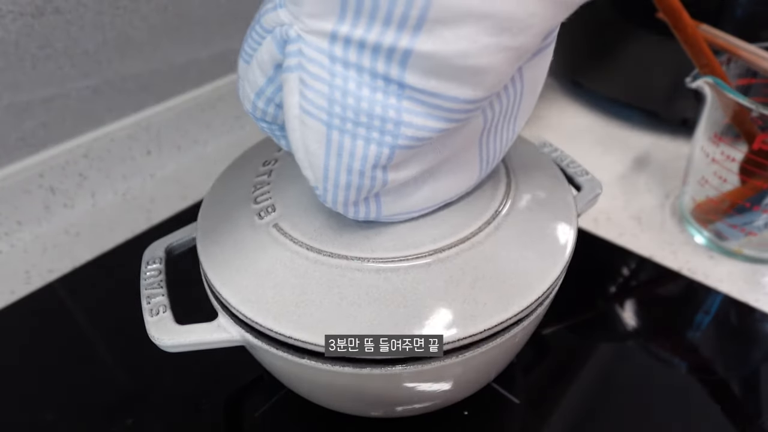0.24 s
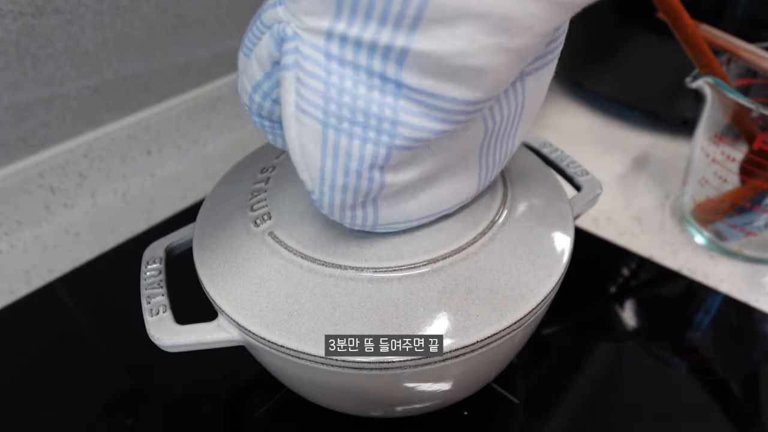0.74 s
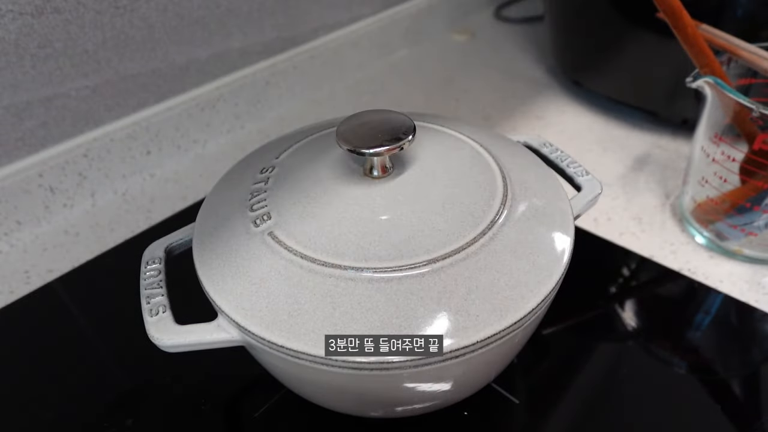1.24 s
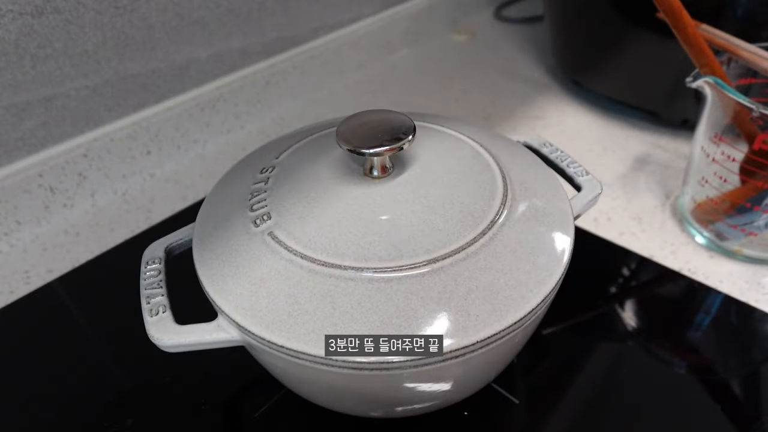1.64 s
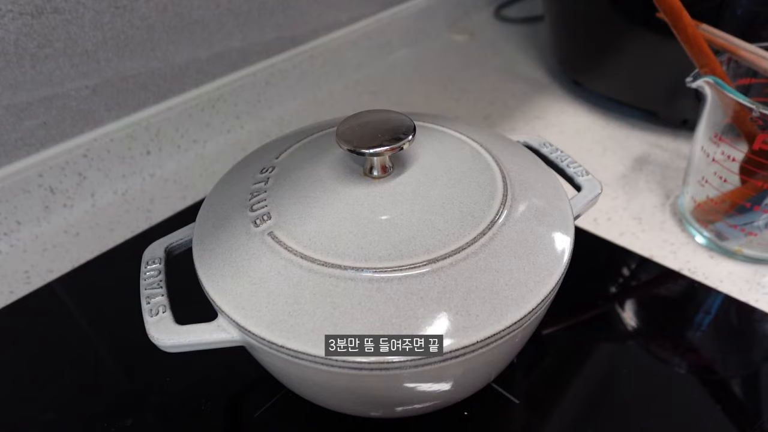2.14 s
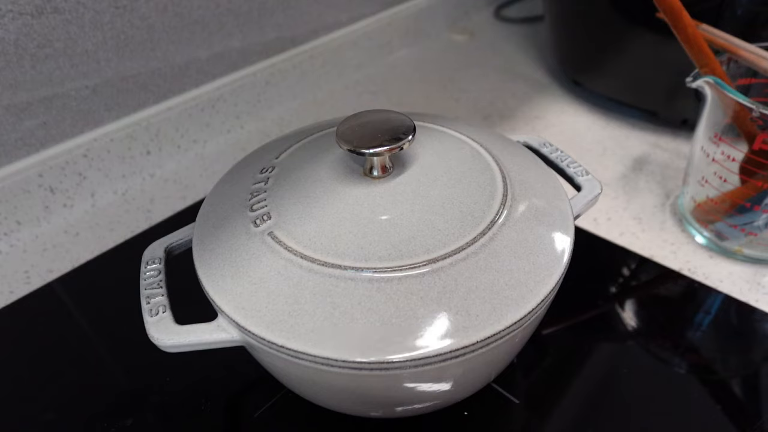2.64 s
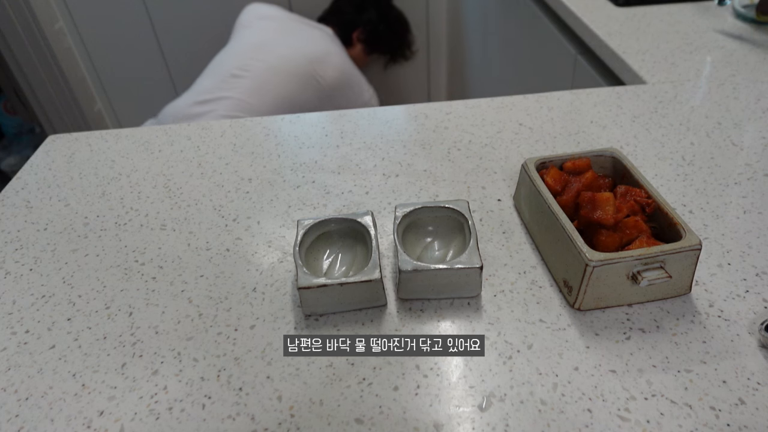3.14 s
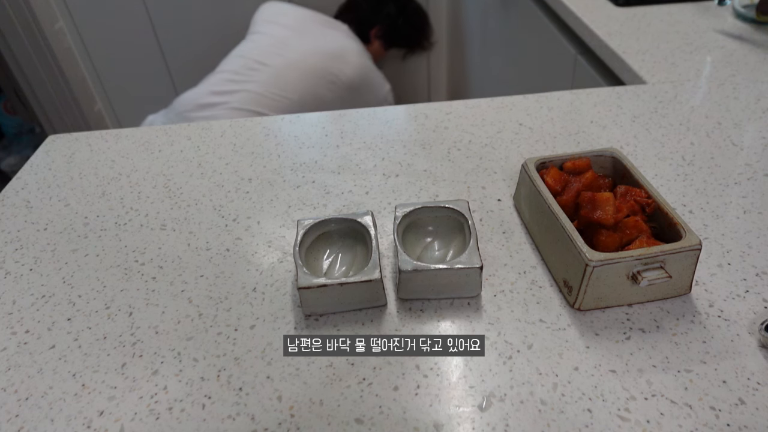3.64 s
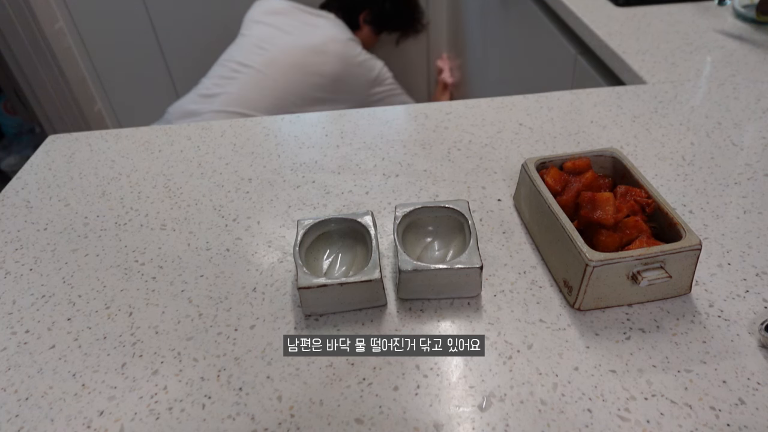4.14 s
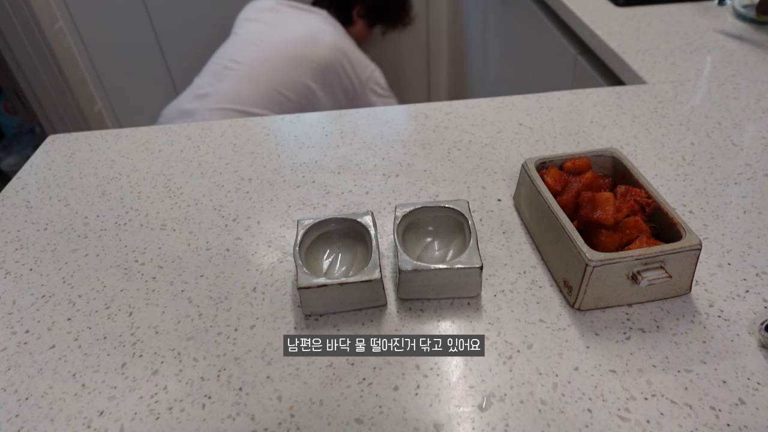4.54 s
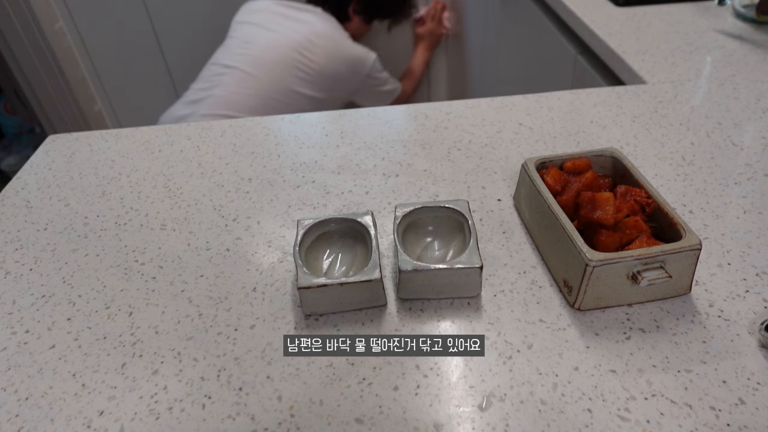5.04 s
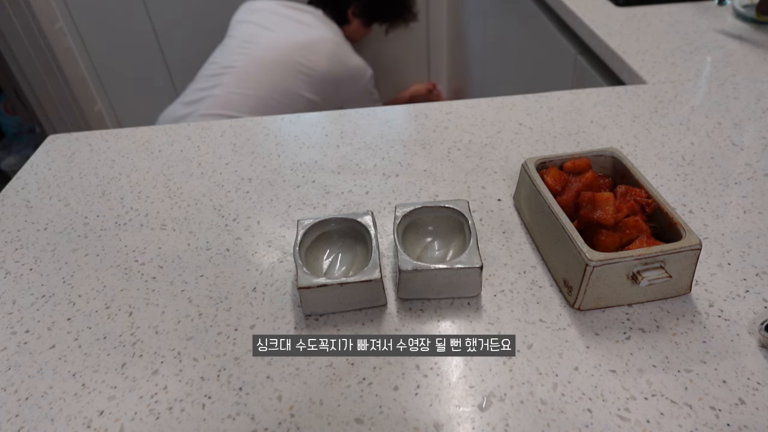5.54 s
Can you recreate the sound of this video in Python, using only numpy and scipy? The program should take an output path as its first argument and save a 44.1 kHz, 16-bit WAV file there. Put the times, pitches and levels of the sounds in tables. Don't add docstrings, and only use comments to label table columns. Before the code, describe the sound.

A quiet home kitchen with steady hood-fan rush and faint fridge hum, nearly mono. At 0-0.13 s thin, wavering steam whistles escape a narrowing gap. At 0.13 s a heavy enamelled iron lid strikes its pot close by, ringing brightly over a low thud, and rocks until 0.28. At 0.38 it drops flat with another clank, then bounces and chatters at 0.46-0.6, quickly damped. From 0.9 to 2.6 s a quilted mitt rustles softly, with a sharp plastic tick at 1.3 and a soft bump near 2.2. At 2.65 the place changes: the fan rush grows fuller and lower. Behind a counter a rag wipes the floor in short, uneven, grainy strokes. A hard, multiple clack with a thump lands at 3.17, smaller knocks at 4.0, hollow, strong cupboard bumps at 4.31-4.4, and light clinks at 4.67-5.1. Last brushes and a clack come around 5.3-5.6, blurred by room echoes.

```python
import sys
import numpy as np
from scipy import signal
from scipy.fft import rfft, irfft, next_fast_len
from scipy.io import wavfile
from scipy.ndimage import uniform_filter1d, map_coordinates

SR = 44100
rng = np.random.default_rng(int(sys.argv[2]) if len(sys.argv) > 2 else 0)


def gain_from_db(level_db):
    decades = np.asarray(level_db, float) / 20
    return 10 ** decades


def transcribe(signal):
    frames = np.atleast_2d(signal).T
    limited = np.clip(frames, -1, 1)
    pcm = np.round(limited * 32767).astype(np.int16)
    wavfile.write(sys.argv[1], SR, pcm)


N = 255339
TIME = np.arange(N) / SR


def unit(x):
    return x / np.sqrt(np.mean(x ** 2) + 1e-20)


def along(points, hz):
    point_hz, point_db = np.transpose(points)
    return np.interp(np.log(hz + 1), np.log(point_hz + 1), point_db)


def noise(n, gain):
    m = next_fast_len(n)
    spectrum = rfft(rng.standard_normal(m)) * gain(np.fft.rfftfreq(m, 1 / SR))
    return unit(irfft(spectrum, m)[:n])


def coloured(points):
    return lambda hz: gain_from_db(along(points, hz))


def bump(centre_hz, octaves):
    return lambda hz: np.exp(-.5 * (np.log2((hz + 1) / centre_hz) / octaves) ** 2)


def wobble(rate):
    return map_coordinates(rng.standard_normal(int(N * rate / SR) + 4), [TIME * rate])


def patchy(x, depth_db, bins, frames):
    z = signal.stft(x, nperseg=256)[2]
    field = uniform_filter1d(rng.standard_normal(z.shape), bins, axis=0)
    field = uniform_filter1d(field, frames, axis=1)
    return signal.istft(z * gain_from_db(depth_db * unit(field)), nperseg=256)[1][:N]


def add(track, s, sound):
    part = track[round(s * SR):]
    part[:len(sound)] += sound[:len(part)]


# (pitch_hz, level_db)
HOOD_COLOUR = [(15, -39), (30, -18), (49, -13.5), (123, 0.5), (180, -11.5), (293, -5.5), (400, -7),
               (560, -22), (760, -30.5), (950, -20), (1230, -15.5), (2300, -22.5), (3520, -28),
               (16000, -35.5)]
# (pitch_hz, level_db)
COUNTER_COLOUR = [(15, -20), (25, 5.5), (70, 7), (117, -1.5), (242, 5), (335, 0), (416, -5), (607, -10.5),
                  (754, -28), (911, -12.5), (1330, -6.5), (2110, -19), (2350, -15), (3160, -27),
                  (16000, -28.5)]
# (pitch_hz, near_hob_db, at_counter_db)
MOTOR_HUMS = [(46.6, -51, -67), (125.5, -60.5, -61.5), (161.8, -58.5, -55.5), (240.5, -63, -56),
              (263, -62.5, -84), (361.6, -65.5, -93), (379, -86, -74.5), (454, -64.5, -63.5),
              (1214, -67, -81), (1493, -65.5, -71), (1687, -63, -67)]


def kitchen():
    change_s, fade_s = 2.64, 0.068
    later = np.clip((TIME - change_s) / fade_s, 0, 1)
    near = gain_from_db(-48 + .8 * wobble(4)) * noise(N, coloured(HOOD_COLOUR))
    far = gain_from_db(-46.5 + 0.6 * wobble(4.2)) * noise(N, coloured(COUNTER_COLOUR))
    out = near * (1 - later) + far * later
    for hz, near_db, far_db in MOTOR_HUMS:
        level_db = near_db + (far_db - near_db) * later
        out += gain_from_db(level_db) * noise(N, bump(hz, 0.012 + 3 / hz))
    return out


def pressure(strokes, press_db_per_s, lift_db_per_s):
    s, held, db, fizz_db, drag_db = np.transpose(strokes)[:, :, None]
    t = TIME[::64]
    pressing, lifting = np.maximum(s - t, 0), np.maximum(t - s - held, 0)
    level_db = db - press_db_per_s * pressing - lift_db_per_s * lifting
    powers = [np.sum(gain_from_db(level_db + share_db) ** 2, axis=0) for share_db in (0 * db, fizz_db, drag_db)]
    return np.array([np.interp(TIME, t, power) for power in powers])


# (full_pressure_s, held_s, rub_db, fizz_db re rub, drag_db re rub)
MITT_STROKES = [
    (.915, 0.089, -52.5, -5.5, -22),
    (1.15, 0.12, -45, -5, -9),
    (1.4, 0.26, -53, -4, -3),
    (1.69, 0.036, -60.5, 5.5, -12),
    (1.95, 0.15, -58, -4, -3),
    (2.43, 0.075, -60.5, -33, -21),
    (2.6, .05, -56, 1, -18),
]
# (full_pressure_s, held_s, rub_db, fizz_db re rub, drag_db re rub)
RAG_STROKES = [(2.7, 0.06, -43, -2, -6.5), (2.8, 0.062, -37, -10, -10), (2.92, 0.085, -51, -5, 5.5),
               (3.03, 0.11, -38.5, -8, -4.5), (3.18, 0.053, -37.5, -3.5, 4), (3.35, 0.054, -49, -4, -15),
               (3.567, 0.22, -50, -5, -8), (4.012, 0.06, -53.5, -6, -9), (4.11, 0.13, -53, 2.5, -21),
               (4.311, 0.042, -37.5, -7, -0.5), (4.675, 0.083, -71, -12, 5), (4.78, 0.012, -50.5, -6, 2),
               (4.85, 0.13, -53, -0.5, -3.5), (5.065, 0.025, -44, -1.5, -6), (5.13, 0.078, -52, 2.5, -7),
               (5.24, 0.037, -61.5, 8, -6), (5.338, 0.01, -38.5, -6, -2.5), (5.418, 0.057, -42.5, -0.5, -8),
               (5.62, 0.07, -44.5, -8.5, -3.5), (5.74, .06, -53, -3, -23)]
# (pitch_hz, level_db per Hz)
RAG_RUB = [(1000, -25), (1800, -3.5), (2500, -1), (3500, 1), (5500, -1.5), (8000, -10), (12000, -31)]
# (pitch_hz, level_db per Hz)
FABRIC_FIZZ = [(3000, -19), (6000, 2), (9000, 0), (16000, -5)]
# (pitch_hz, level_db per Hz)
FABRIC_DRAG = [(150, -65), (400, -2), (760, -17), (1100, -2.5), (1700, -6.5), (2500, -8), (4000, -32)]
# (pitch_hz, level_db per Hz)
MITT_RUB = [(1500, -40), (2500, -1.5), (5000, -0.5), (7000, -6.5), (12000, -29)]


def cloth():
    mitt_rub, mitt_fizz, mitt_drag = pressure(MITT_STROKES, press_db_per_s=158, lift_db_per_s=84)
    rag_rub, rag_fizz, rag_drag = pressure(RAG_STROKES, press_db_per_s=264, lift_db_per_s=153)
    layers = [(rag_rub, RAG_RUB), (mitt_fizz + rag_fizz, FABRIC_FIZZ),
              (mitt_drag + rag_drag, FABRIC_DRAG), (mitt_rub, MITT_RUB)]
    grain = gain_from_db(0.24 * wobble(35) + 0.2 * wobble(360))
    out = np.zeros(N)
    for power, colour in layers:
        threads = patchy(noise(N, coloured(colour)), 1.5, bins=8, frames=14)
        out += np.sqrt(power) * unit(grain * threads)
    return out


# (start_s, level_db, centre_hz, width_octaves, fade_60db_s)
WORKTOP_TOUCHES = [
    (0.957, -48, 6500, 0.33, 0.049),
    (1.217, -50.5, 1750, 0.34, 0.51),
    (1.235, -47, 1010, .12, .1),
    (1.645, -46, 6960, 0.38, 0.092),
    (1.685, -48, 6500, 0.5, 0.059),
    (2.128, -48.5, 1820, 0.66, 0.13),
    (2.179, -36, 168, 0.29, 0.11),
]
# (start_s, level_db, centre_hz, width_octaves, fade_60db_s)
FLOOR_THUMPS = [(2.873, -35.5, 450, 2.15, 0.45), (3.021, -30, 200, 2.4, 0.086),
                (3.169, -24.5, 183, 0.81, 0.47), (3.19, -34, 330, 1.3, 0.17), (3.241, -37, 98, 0.19, 0.59),
                (3.29, -29.5, 520, 1.83, 0.22), (3.995, -31, 150, 1.14, 0.27), (4.041, -34, 108, 1, 0.25),
                (4.221, -50.5, 345, 0.38, 0.34), (4.345, -25, 130, 1.17, 0.51), (4.68, -32, 184, 1.3, 0.1),
                (5.497, -39, 300, 3.3, 0.097)]
# (start_s, level_db, centre_hz, width_octaves, fade_60db_s)
COUNTER_CLACKS = [(2.709, -40.5, 2080, 0.64, 1), (2.774, -36, 4300, 0.84, 0.33),
                  (3.018, -53, 1860, 1.4, 0.3), (3.159, -33, 2520, 0.31, 0.089),
                  (3.166, -17.5, 1030, 1.32, 0.25), (3.169, -25.5, 5300, 0.3, 0.046),
                  (3.177, -21, 1410, 0.29, 0.16), (3.193, -27, 1190, 0.98, 0.18),
                  (3.203, -28.5, 1600, .5, .1), (3.215, -42, 4300, 0.43, 0.27),
                  (3.255, -41, 4840, 0.59, 0.33), (3.235, -30.5, 1340, 0.74, 0.48),
                  (3.293, -43, 1480, 0.76, 0.21), (3.181, -25.5, 4770, 0.37, 0.24),
                  (3.996, -50, 7000, 1.1, 0.15), (3.999, -36, 1270, 0.62, 0.23),
                  (4.337, -31, 2280, 1.12, 0.21), (4.34, -38, 1020, 0.098, 0.094),
                  (4.37, -25.5, 1310, 0.72, 0.036), (4.665, -36, 1240, 1.43, 0.17),
                  (4.667, -44.5, 998, 0.06, 0.27), (4.667, -43, 1480, .06, 0.15),
                  (4.839, -51, 2540, .05, 0.26), (4.768, -43.5, 2470, 0.11, 0.3),
                  (4.769, -42, 4460, 0.25, 0.16), (4.838, -44, 2040, 0.76, 0.27),
                  (5.041, -45.5, 5000, 1.1, 0.75), (5.042, -46, 2300, 0.06, 0.2),
                  (5.057, -44.5, 2230, 0.044, 0.3), (5.042, -52, 5000, .04, .1),
                  (5.057, -50, 4900, .04, .1), (5.044, -54, 3270, .06, .3), (5.108, -51, 2470, .2, .2),
                  (5.33, -44, 6850, 0.098, 0.38), (5.582, -32, 2840, 0.81, 0.21),
                  (5.598, -31.5, 3760, 0.17, 0.07)]
# (start_s, level_db, centre_hz, width_octaves)
KNEE_BUMPS = [
    (4.313, -13.5, 318, 0.083),
    (4.3386, -12, 380, 0.39),
    (4.346, -10.5, 263, 0.23),
    (4.379, -14.5, 260, 0.42),
    (4.41, -29, 208, 0.38),
    (4.441, -29, 170, 0.36),
]
# (pitch_hz, level_db)
WORKTOP_DIP = [(400, 5), (620, 1.5), (760, -3.5), (900, 0.5), (1200, -1)]


def knocks():
    out, t = np.zeros(N), TIME[:SR // 2]
    knees = [(s, db - 18.5, hz, 0.32, 0.28) for s, db, hz, _ in KNEE_BUMPS]
    for s, db, hz, octaves, t60 in WORKTOP_TOUCHES + FLOOR_THUMPS + COUNTER_CLACKS + knees:
        rise = .002 + .9 / hz
        first = 0.93 * gain_from_db(-60 * t / (6 * rise)) * (1 - np.exp(-t / 0.00067))
        if hz <= 999:
            first = 0 * t
        echoes = gain_from_db(0.42 * noise(len(t), bump(180, 2.6))) * gain_from_db(-60 * t / t60)
        tail = gain_from_db(-11 - 60 * t / (0.6 - hz / 12000))
        shape = first + (1 - np.exp(-t / rise)) * (echoes + tail)
        colour = lambda f: bump(hz, octaves)(f) * gain_from_db(along(WORKTOP_DIP, f))
        add(out, s, gain_from_db(db) * shape * noise(len(t), colour))
    return out


def thud(modes, t, rise, centre_hz, octaves, scatter):
    hz, db, t60 = np.transpose(modes)[:, :, None]
    pitch = hz * (1 + scatter * rng.standard_normal(hz.shape))
    rings = bump(centre_hz, octaves)(hz) * gain_from_db(db - 60 * t / t60) * np.sin(2 * np.pi * pitch * t)
    return rings.sum(axis=0) * (1 - np.exp(-t / rise))


# (pitch_hz, level_db, fade_60db_s)
PANEL_MODES = [(78, -6, .25), (163, 1, 0.18), (207, 2, 0.12), (240, -1, 0.078), (282, 6, 0.075),
               (312.5, -3.5, 0.13), (423, -7.5, 0.098), (463, -10, 0.13), (538, -14.5, 0.16)]


def cupboard():
    out, t = np.zeros(N), TIME[:SR // 3]
    for s, db, centre_hz, octaves in KNEE_BUMPS:
        add(out, s, gain_from_db(db) * thud(PANEL_MODES, t, 0.0054, centre_hz, octaves, scatter=0.012))
    return out


# (start_s, level_db, pitch_hz, fade_60db_s)
CATCH_TICKS = [(1.2952, -15, 5360, 0.0049), (1.297, -30, 4950, 0.028), (1.299, -30, 6940, 0.014),
               (1.3125, -32, 3500, 0.0037), (1.3405, -20, 3480, 0.0019), (1.342, -28, 4330, 0.0091),
               (1.774, -40, 7800, 0.011), (0.013, -48, 5800, .03), (.055, -42, 2500, .012),
               (3.1663, -8, 1470, 0.0054), (3.181, -11, 1400, 0.003), (3.1948, -9, 1320, 0.0033),
               (4.8399, -29.5, 1010, 0.0017), (5.586, -16, 3000, 0.0016)]


def ticks():
    out, t = np.zeros(N), TIME[:SR // 20]
    for s, db, hz, t60 in CATCH_TICKS:
        ring = np.sin(2 * np.pi * hz * t) + 0.5 * noise(len(t), bump(hz * 0.95, 0.51))
        add(out, s, gain_from_db(db - 60 * t / t60) * (1 - np.exp(-t / 0.00017)) * ring)
    return out


# (pitch_hz, level_db, start_s, end_s, glide_hz_per_s)
STEAM_WHISTLES = [
    (3970, -49, 0, .065, -300),
    (4170, -52, .045, .13, 500),
    (5300, -54, 0, .125, -100),
    (3150, -62, .045, .125, 30),
    (6600, -63, 0, .05, 30),
    (6300, -65, .055, .125, 300),
    (3400, -65, 0, .03, 0),
]


def steam():
    out, t = np.zeros(N), TIME[:SR // 5]
    for hz, db, start, end, glide in STEAM_WHISTLES:
        gate = np.clip(np.minimum(t - start + .01, end - t) / .02, 0, 1)
        flutter, waver = noise(len(t), bump(66, 3.4)), noise(len(t), bump(53, 1.0))
        pitch = hz + glide * (t - start) + 22 * waver
        whistle = np.sin(2 * np.pi * np.cumsum(pitch) / SR)
        add(out, 0, gain_from_db(db + 3.5 * flutter) * gate * whistle)
    return out


LID_HZ = [947, 1047, 1367, 1523, 1830, 1885, 2180, 2530, 2998, 3443, 3535, 3714, 4030, 4330, 5373, 5432,
          5787, 5880, 6045, 6764, 7030, 7693, 8520, 9119, 9288, 9507, 10215, 10565, 11130, 11440, 12830,
          12945, 13020, 13745]
# (start_s, level_db, centre_hz)
RIM_TAPS = [(.143, -47, 3470), (0.24, -48, 5500), (.266, -48, 3600), (.284, -45, 6000), (.287, -54, 3000),
            (.388, -34, 3700), (0.401, -37, 4200), (.462, -48, 5470), (.472, -40, 3500), (.484, -44, 4240),
            (.5, -54, 7260), (.531, -45, 3600), (.546, -43.5, 3600), (.563, -50, 6000)]


def rattle():
    out, t, hz = np.zeros(N), TIME[:SR // 8], np.c_[LID_HZ]
    for s, db, centre_hz in RIM_TAPS:
        strength = bump(centre_hz, .3)(hz) * gain_from_db(1.8 * rng.standard_normal(hz.shape) - 60 * t / 0.081)
        rings = strength * np.sin(2 * np.pi * hz * t)
        tap = gain_from_db(-9 - 60 * t / 0.02) * noise(len(t), bump(centre_hz, 0.84))
        add(out, s, gain_from_db(db) * (rings.sum(axis=0) + tap) * (1 - np.exp(-t / 0.0013)))
    return out


HANDOVER_S = 0.0039


def boom(modes, share, rise, s, until, t):
    hz, db, t60 = np.transpose(modes)[:, :, None]
    rings = share(hz) * gain_from_db(db - 60 * t / t60) * np.sin(2 * np.pi * hz * (t + s))
    stopped = np.exp(-np.maximum(t + s - until, 0) / HANDOVER_S)
    return rings.sum(axis=0) * (1 - np.exp(-t / rise)) * stopped


# (start_s, hob_boom_db, pot_knock_db, knock_centre_hz, crack_db)
RIM_CONTACTS = [(0.129, -25, -20, 403, -24), (.136, -26, -14.5, 365, -46), (0.148, -18, -21, 374, -36),
                (0.162, -22, -21, 370, -35), (0.195, -34, -32, 370, -56), (0.225, -43, -32, 365, -40),
                (0.243, -24, -32, 370, -54), (0.26, -41, -30, 300, -37.5), (0.279, -28, -29, 442, -36),
                (0.3765, -19, -13.5, 280, -29), (.388, -18, -23, 272, -20), (.4, -27, -8.5, 440, -25),
                (0.412, -16, -18, 325, -52), (0.423, -24, -26, 300, -52), (0.4592, -16, -9.5, 413, -19),
                (.466, -15, -10.5, 413, -23), (0.476, -17, -14.5, 413, -22), (.487, -36, -27, 400, -44),
                (0.4972, -21, -15.5, 330, -24), (.51, -18.5, -28, 384, -42), (0.524, -22, -25, 310, -30),
                (.541, -25, -27, 317, -38), (0.558, -24, -19, 353, -38), (0.598, -29.5, -35.5, 356, -59)]
# (pitch_hz, level_db, fade_60db_s)
HOB_MODES = [(83.2, -3.5, 0.33), (104.85, 5, 0.28), (133.3, -2, 0.14), (150, -1, 0.15)]
# (pitch_hz, level_db, fade_60db_s)
POT_MODES = [(244.6, 3.5, 0.069), (271.6, -2, 0.061), (366.7, 4.5, 0.085), (430, 4.5, 0.041),
             (461, -13, 0.046), (602, -6.5, 0.15), (665, -8.5, 0.31), (705, -11, .1), (835, -8, 0.18)]
SEATING_DB = [(-28, -44, -57, -54, -39), (-31, -49, -33, -46, -60), (-27.5, -31, -41, -54, -62),
              (-34, -17, -51, -52, -56), (-39.5, -49, -46, -37, -43), (-54, -32, -29, -35, -49),
              (-22, -34, -29, -46, -48), (-52, -36, -41, -42, -55), (-42, -53, -58, -60, -53),
              (-32, -37, -22.5, -52, -43.5), (-25, -27, -42, -40, -51), (-22.5, -34, -30, -44, -50),
              (-31, -53, -41, -46, -56), (-34, -54, -34.5, -52, -47), (-38, -53, -46, -44, -56),
              (-33, -43, -48, -44, -56), (-36, -50, -54, -51, -62), (-34, -51, -54, -58, -64),
              (-34, -50, -62, -66, -59), (-36, -50, -57, -52, -56), (-50, -56, -53, -53, -58),
              (-35.5, -43, -39, -49, -62), (-45, -53, -60, -49, -61), (-66, -63, -73, -73, -72),
              (-55, -67, -66, -75, -73), (-52, -72, -72, -80, -71), (-34.5, -49, -62, -60, -66),
              (-46, -55, -61, -66, -68), (-48, -65, -66, -69, -75), (-50, -59, -72, -72, -70),
              (-46, -61, -66, -66, -70), (-54, -63, -60, -63, -66), (-58, -72, -80, -76, -75),
              (-52, -75, -71, -71, -72)]


def rim():
    out, chatter, t = np.zeros(N), np.zeros(N), TIME[:SR // 2]
    ends = [row[0] for row in RIM_CONTACTS[1:]] + [N / SR]
    for (s, boom_db, knock_db, knock_hz, crack_db), until in zip(RIM_CONTACTS, ends):
        top_hz = 2530 if s > 0.33 else 5960
        snap = (gain_from_db(-60 * t / 0.086) + 0.48 * gain_from_db(-60 * t / 0.011)) * (1 - np.exp(-(t / 0.0014) ** 2))
        crack = noise(len(t), lambda f: bump(1500, 1.4)(f) / (1 + (f / top_hz) ** 6))
        near_knock = lambda f: 0.22 + bump(knock_hz, .22)(f)
        add(out, s, gain_from_db(boom_db - 4.5) * boom(HOB_MODES, np.ones_like, HANDOVER_S, s, until, t))
        add(out, s, gain_from_db(knock_db - 5.0) * boom(POT_MODES, near_knock, 0.0011, s, until, t))
        add(out, s, gain_from_db(crack_db - 3.5) * snap * crack)
        add(chatter, s, gain_from_db(crack_db - 60 * t / 0.16) * noise(len(t), bump(2200, 1.6)))
    ease_db = np.median(SEATING_DB, axis=1, keepdims=True)
    held = gain_from_db(0.93 * (ease_db + 37.5) - 60 * t / 0.055) * np.sin(2 * np.pi * np.c_[LID_HZ] * t)
    return out + gain_from_db(-46.5) * signal.fftconvolve(chatter, held.sum(axis=0))[:N]


# (start_s, rise_s, bright_enamel_crack_db)
LID_BLOWS = [
    (0.128, 0.0012, -41),
    (0.18, 0.0054, -65),
    (.238, .006, -53),
    (.262, 0.0042, -53),
    (0.28, 0.0023, -47),
    (0.3746, 0.0002, -43),
    (0.459, 0.0011, -58),
    (.4985, 0.00061, -62),
    (0.517, 0.0076, -65),
    (.56, 0.0057, -52),
]
LID_FADE_S = [0.14, 0.34, 0.14, 0.03, 1, 0.16, 0.048, 0.22, 0.14, .53, 0.19, 0.29, 0.26, 0.17, .45, 0.53,
              .15, .11, 0.2, 0.4, .3, 0.51, 0.21, .5, 0.19, .15, 0.21, .17, 0.12, 0.14, .2, .2, .2, .16]
TILTED_DB = [(-27, -49, -43, -55, -42), (-30, -49, -55, -56, -49), (-37, -60, -53, -36, -55),
             (-24, -50, -58, -64, -50), (-46, -42, -40.5, -42, -40), (-76, -61, -56, -55, -60),
             (-27, -43, -53, -36, -35), (-58, -57, -57, -65, -66), (-36, -61, -71, -69, -45),
             (-35.5, -36, -40, -37, -39.5), (-52, -64, -63, -47, -50), (-43, -50, -43, -35, -46),
             (-38, -47, -51, -48, -32), (-56, -59, -55, -48, -37), (-37, -48, -44, -57, -55),
             (-43, -47, -55, -43, -51), (-41, -52, -54, -42, -47), (-35, -52, -44, -55, -53),
             (-39, -56, -52, -50, -45), (-39, -51, -58, -47, -57), (-36, -52, -49, -43, -44),
             (-37.5, -44, -58, -54, -45), (-41, -50, -49, -49, -40.5), (-65, -52, -60, -65, -76),
             (-41, -58, -69, -67, -71), (-52, -73, -72, -73, -61), (-43, -54, -61, -58, -63),
             (-60, -60, -57, -58, -56), (-74, -67, -75, -76, -60), (-61, -66, -65, -84, -61),
             (-45, -59, -65, -58, -45), (-52, -70, -60, -58, -55), (-49, -59, -73, -63, -64),
             (-70, -66, -74, -69, -51)]


def lid():
    out, t, hz = np.zeros(N), TIME[:SR // 4], np.c_[LID_HZ]
    levels, t60 = np.hstack([TILTED_DB, SEATING_DB]).T[:, :, None], np.c_[LID_FADE_S]
    faint_hz = rng.uniform(4560, 12700, size=(36, 1))
    jolts = np.cumsum(rng.normal(0, 1, levels.shape), axis=0)
    phases = jolts + 2 * np.pi * rng.random(hz.shape)
    for (s, rise, crack_db), after, db, phase in zip(LID_BLOWS, LID_BLOWS[1:] + [None], levels, phases):
        if after:
            left = np.exp(-(np.maximum(t + s - after[0], 0) / after[1]) ** 2.0)
        else:
            left = gain_from_db(-60 * t / 0.57)
        knots = rng.standard_normal((len(hz), 30))
        flutter_db = 1.8 * np.array([np.interp(t * 70, np.arange(len(k)), k) for k in knots])
        ring = gain_from_db(db + flutter_db - 60 * t / t60) * np.sin(2 * np.pi * hz * (t + s) + phase)
        faint_db = -15.5 + rng.normal(0, 4.1, faint_hz.shape) - 60 * t / 0.18
        shimmer = (gain_from_db(faint_db) * np.sin(2 * np.pi * faint_hz * t)).sum(axis=0)
        enamel = 1.4 * gain_from_db(-60 * t / 0.086) * noise(len(t), bump(7700, 0.99))
        crack = gain_from_db(crack_db) * (enamel + shimmer * left)
        add(out, s, (ring.sum(axis=0) * left + crack) * (1 - np.exp(-(t / rise) ** 0.76)))
    return out


def room(near):
    t = TIME[:SR // 2]
    tail = noise(len(t), bump(770, 2.54)) * gain_from_db(-60 * t / 0.41)
    return signal.fftconvolve(near, tail / np.linalg.norm(tail))[:N]


def left_and_right(mid):
    power_now = np.abs(uniform_filter1d(mid ** 2, size=400))
    power_before = np.roll(np.abs(uniform_filter1d(mid ** 2, size=2000)) + 1e-9, 1400)
    level_db = -41 + 8.5 * (power_now / power_before > 8)
    bright = 0.5 * (mid - uniform_filter1d(mid, size=150)) + 1.27 * np.gradient(mid)
    side = gain_from_db(level_db) * patchy(np.roll(bright, 200), 9, bins=12, frames=7)
    return np.array([mid + side, mid - side])


def scene():
    background = kitchen() + cloth() + knocks() + cupboard()
    near = ticks() + rim()
    return left_and_right(background + near + gain_from_db(-12.5) * room(near) + steam() + rattle() + lid())


def roll_off(x):
    return signal.sosfilt(signal.butter(12, 16800, fs=SR, output="sos"), x)


def record(dry):
    m = next_fast_len(N)
    hz = np.fft.rfftfreq(m, 1 / SR)
    band = (hz < 15830) / np.sqrt(1 + (45 / (hz + 1)) ** 6)
    mix = irfft(rfft(dry, m) * band, m)[:, :N]
    return roll_off(mix)


dry = scene()
out = record(dry)
transcribe(out)
```